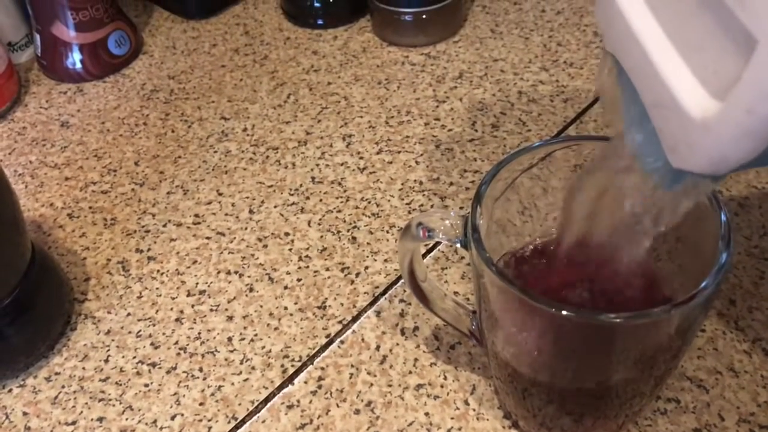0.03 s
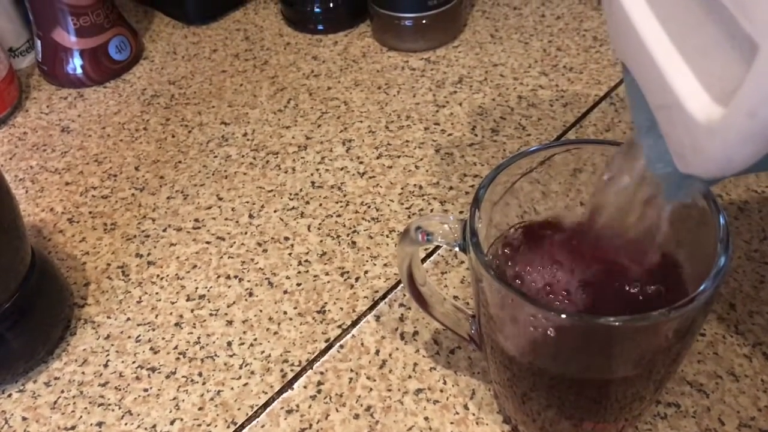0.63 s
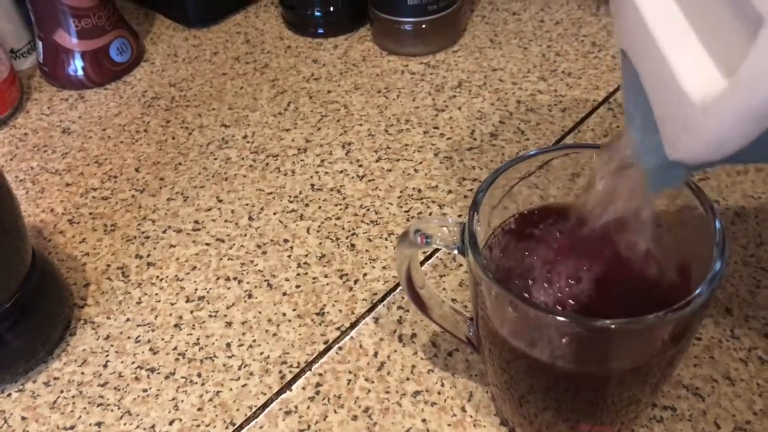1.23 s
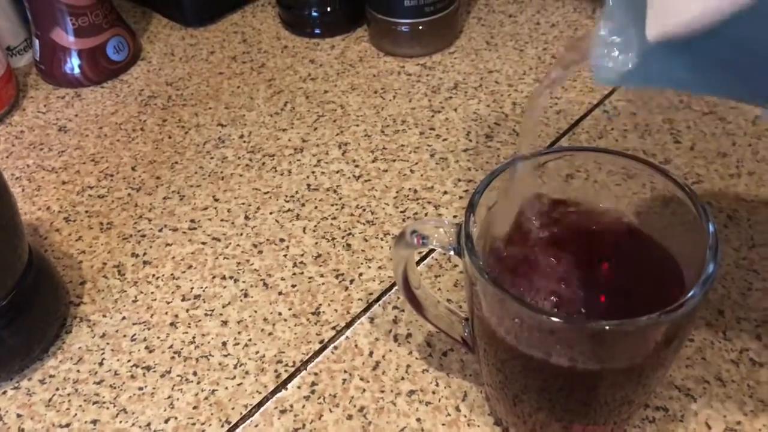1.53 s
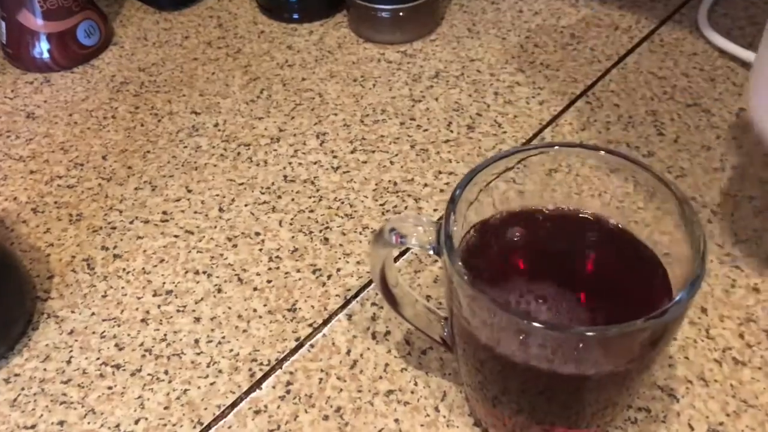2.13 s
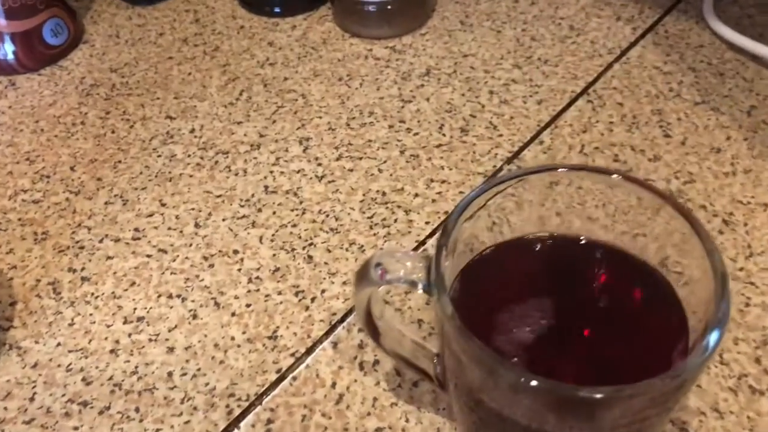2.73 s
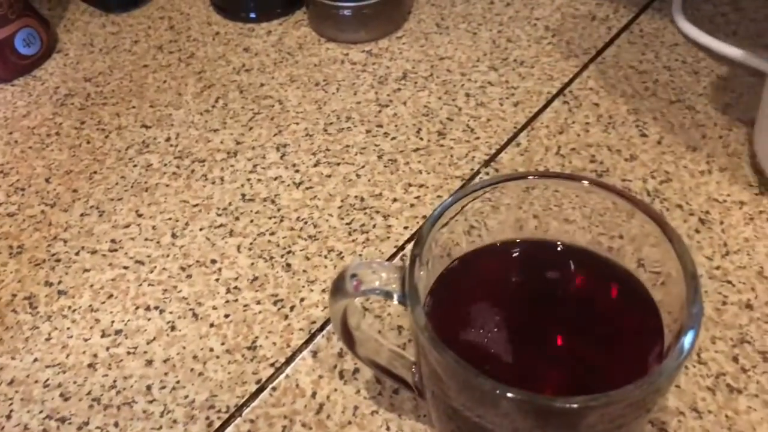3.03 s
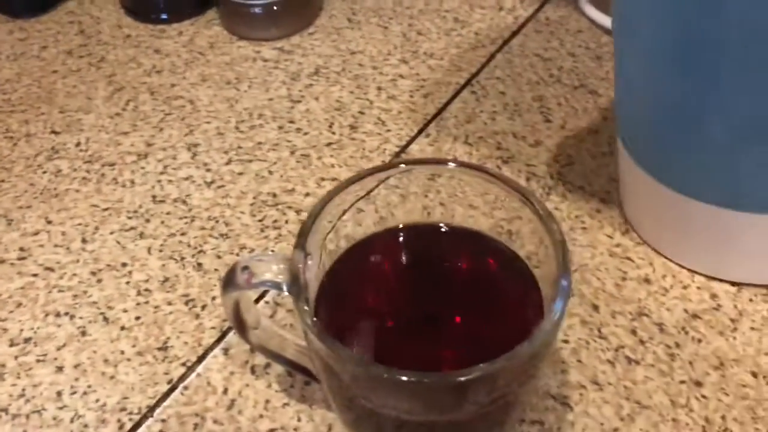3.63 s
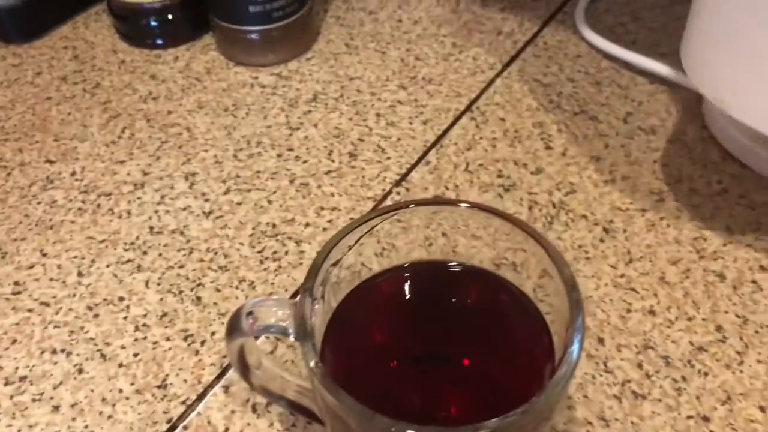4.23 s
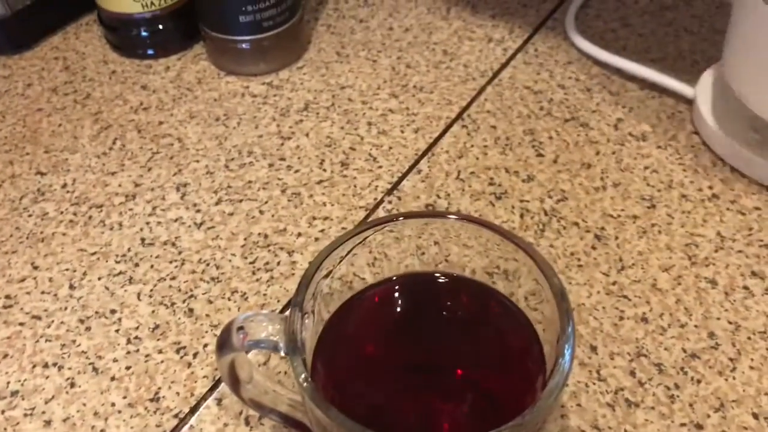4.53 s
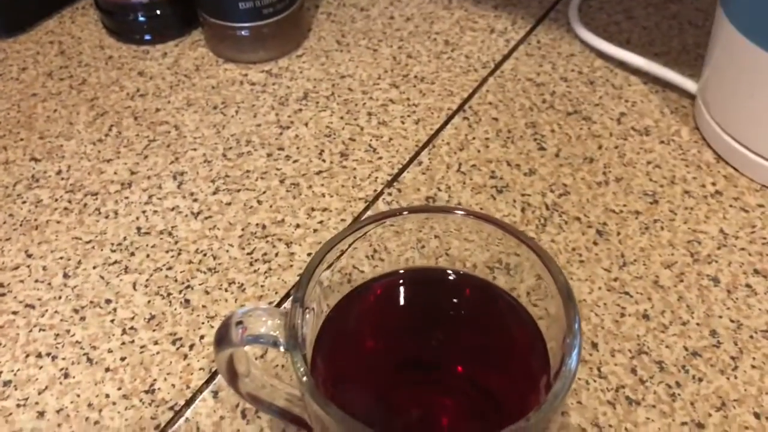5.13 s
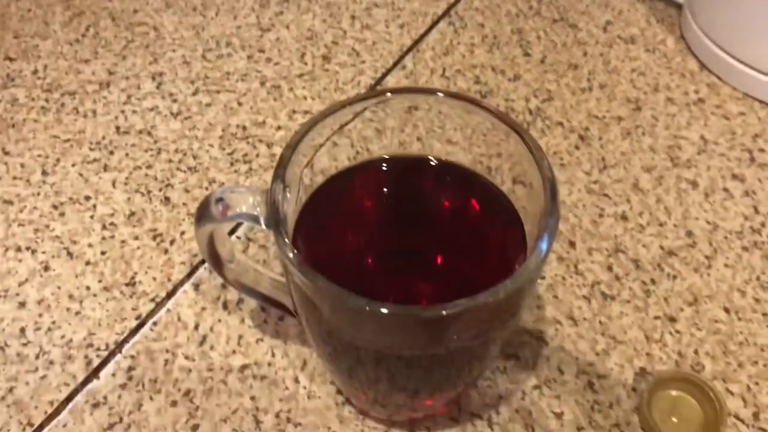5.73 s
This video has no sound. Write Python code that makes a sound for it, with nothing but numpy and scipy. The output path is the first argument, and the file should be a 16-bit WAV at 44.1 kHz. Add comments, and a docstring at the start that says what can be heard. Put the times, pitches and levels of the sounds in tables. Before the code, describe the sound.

Hot water pours from a kettle into a glass mug close to the microphone, gurgling, plopping and fizzing before it thins to a few last drops. A little further back, a bottle knocks and scuffs on a hollow kitchen worktop, each blow giving a dull boom. The kettle then rattles onto its base with a quick run of clacks. A low electrical hum sits underneath in the small room.

```python
"""Kettle pour in a small kitchen

Hot water runs into a glass mug: bubbles plop and fizz in its hollow, then the last drops fall.
The kettle is moved away, a bottle is knocked about on the worktop, and the kettle rattles home
onto its base. The hollow worktop booms under every blow; mains hum sits under it all."""
import sys
import numpy as np
from scipy import signal
from scipy.fft import rfft, irfft
from scipy.io import wavfile
from scipy.ndimage import uniform_filter1d

SR = 44100
rng = np.random.default_rng(int(sys.argv[2]) if len(sys.argv) > 2 else 0)


def wav_out(sig):
    """Save sig, one row per channel (or a flat mono array), as 16-bit PCM at SR to the path in sys.argv[1]."""
    wavfile.write(sys.argv[1], SR, np.round(np.clip(np.atleast_2d(sig).T, -1, 1) * 32767).astype(np.int16))


N = 255759
T = np.arange(N) / SR


def from_db(db):
    """Decibels to gain."""
    return 10 ** (np.asarray(db) / 20)


def unit_rms(x):
    """Scale to rms 1."""
    return x / np.sqrt(np.mean(x ** 2) + 1e-20)


def add(track, s, sound):
    """Mix a sound in at s seconds."""
    i = max(round(s * SR), 0)
    track[i:i + len(sound)] += sound[:N - i]


def decay(t60, size):
    """An envelope that falls 60 dB in t60 seconds."""
    return from_db(-60 * T[:size] / t60)


def attack(rise_s, size):
    """An envelope that eases up to full level."""
    return 1 - np.exp(-T[:size] / rise_s)


def stroke(start_s, length_s, edge_s):
    """An envelope that rises, holds and falls."""
    return np.clip(np.minimum(T - start_s, start_s + length_s - T) / edge_s, 0, 1)


def drift(rate_hz):
    """A modulator that glides between random values."""
    knots = rng.standard_normal(4000)
    return np.interp(T * rate_hz, np.arange(len(knots)), knots)


def colour(x, spectrum, tilt=0, pivot_hz=1200, size=8192):
    """Minimum-phase EQ through (Hz, dB) points, tilted in dB per octave about the pivot."""
    octave = np.log2(np.maximum(np.fft.rfftfreq(size, 1 / SR), 1))
    hz, db = np.transpose(spectrum)
    curve_db = np.interp(octave, np.log2(hz), db) + tilt * np.maximum(octave - np.log2(pivot_hz), -1)
    cepstrum = irfft(np.log(from_db(curve_db)))
    cepstrum[1:size // 2] *= 2
    cepstrum[size // 2 + 1:] = 0
    return signal.fftconvolve(x, irfft(np.exp(rfft(cepstrum))))[:len(x)]


def resonate(x, peaks):
    """Parallel resonators, each (pitch [Hz], width [Hz], level [dB])."""
    out = 0
    for hz, width, db in peaks:
        r = np.exp(-np.pi * width / SR)
        poles = [1, -2 * r * np.cos(2 * np.pi * hz / SR), r * r]
        out = out + from_db(db) * (1 - r * r) / 2 * signal.lfilter([1, 0, -1], poles, x + 1e-18)
    return out


def struck(modes, size=24000):
    """The ring after one blow, from modes of (pitch [Hz], level [dB], t60 [s])."""
    return sum(from_db(db) * np.sin(2 * np.pi * hz * T[:size]) * decay(t60, size)
               for hz, db, t60 in modes)


def grains(per_s, spread_db):
    """Random clicks of uneven size and sign."""
    chance, clicks = rng.random(N) * SR / per_s, np.zeros(N)
    hits = np.flatnonzero(chance < 1)
    strength = np.minimum(-np.log(chance[hits] + 1e-9), np.pi)
    clicks[hits] = (1 - 2 * (hits % 2)) * from_db(spread_db * strength)
    return clicks


def burst(t60, size, rise_s=1e-5):
    """A dying chatter of noise, evened out across the spectrum."""
    spectrum = rfft(rng.standard_normal(size) * decay(t60, size) * attack(rise_s, size), 2 * size)
    power = uniform_filter1d(abs(spectrum) ** 2, size=int(size / SR / t60 * 8) + 1)
    return irfft(spectrum * np.sqrt(power.mean() / power))[:size]


def kitchen(x, wet_db, t60, treble_t60, size=26000):
    """Add diffuse reflections from tiles and cupboards; the treble has its own decay time."""
    noise = rng.standard_normal(size)
    low = signal.sosfilt(signal.butter(1, 3000, fs=SR, output="sos"), noise)
    arrival = np.clip(T[:size] / 0.0013 - .5, 0, 1)
    tail = (low * decay(t60, size) + (noise - low) * decay(treble_t60, size)) * arrival
    return x + from_db(wet_db) * signal.fftconvolve(x, tail / np.linalg.norm(tail))[:N]


# Mains hum partials: (pitch [Hz], rms level [dB])
HUM_PARTIALS = [(100, -46.5), (215, -70)]
# Room tone EQ: (frequency [Hz], level [dB])
ROOM_EQ = [(20, -14), (50, -2), (110, -3), (160, -14), (230, -9), (380, -14), (600, -18), (900, -17.5),
           (1500, -20.5), (2800, -29), (3900, -25), (5500, -36.5), (9000, -43.5), (16000, -44.5)]
def background(room_db=-56):
    """The bed: mains hum, wavering a little, over quiet room tone."""
    hum = 0
    for hz, db in HUM_PARTIALS:
        level = np.sqrt(2) * from_db(db + 0.58 * drift(22))
        hum = hum + level * np.sin(2 * np.pi * hz * T + 0.29 * drift(10))
    return hum + from_db(room_db) * unit_rms(colour(rng.standard_normal(N), ROOM_EQ))


# Jolts that reach the spring: (time [s], level [dB])
SPRING_JOLTS = [(2.56, -50), (2.91, -53), (3.255, -30.5), (3.351, -39), (5.095, -49)]
# The spring's ring: (pitch [Hz], level [dB], t60 [s])
SPRING_MODES = [(6514, -17.5, 0.59), (11639, -21.5, 0.24), (14546, -3, .2)]
def spring(swell_s=0.01):
    """A small spring zings, thin and high, when the worktop is jolted."""
    out, zing = np.zeros(N), struck(SPRING_MODES)
    for s, db in SPRING_JOLTS:
        add(out, s, from_db(db) * zing * attack(swell_s, len(zing)))
    return out


# The hollow worktop's boom: (pitch [Hz], level [dB], t60 [s])
WORKTOP_MODES = [(48.4, 7, .16), (96.2, -9.5, 0.99), (140.4, -11, 0.16), (220.1, 3, 0.27),
                 (243.6, -7.5, 0.26), (311.4, -10.5, 0.3), (369.3, -9.5, .16), (424, -36.5, 0.057),
                 (594, -17, 0.053)]
# Rumble EQ of the cupboard below: (frequency [Hz], level [dB])
CUPBOARD_EQ = [(20, -15), (45, 1), (110, 13.5), (165, -6.5), (230, 4.5), (330, -5), (600, -8), (1200, -29),
               (4000, -76.5)]
# A weight set down softly: (time [s], level [dB])
SOFT_LANDINGS = [(2.579, -26), (2.824, -48), (2.913, -23.5), (2.973, -26.5), (3.075, -33), (3.2357, -18.5),
                 (3.2554, -18.5), (3.334, -19.5), (3.3478, -24.5), (3.726, -44), (3.817, -41), (4.645, -36),
                 (5.048, -24), (5.327, -43.5)]
def worktop(bottle_db=-18.5, kettle_db=-17, follows=0.61, boom_db=1, bump_db=11, size=24000):
    """Every blow booms in the worktop and shakes the cupboard; a soft landing adds a dull bump."""
    out = np.zeros(N)
    low_cut = signal.butter(2, 55, "high", fs=SR, output="sos")
    boom = signal.sosfilt(low_cut, struck(WORKTOP_MODES, size)) * attack(0.00054, size)
    thuds = [(s, bottle_db + follows * db) for s, db, _ in BOTTLE_HITS]
    thuds += [(s, kettle_db + follows * db) for s, db in KETTLE_HITS]
    for blows, rumble_db in [(thuds, 16), (SOFT_LANDINGS, 12)]:
        for s, db in blows:
            rumble = colour(burst(t60=0.18, size=size // 2), CUPBOARD_EQ)
            add(out, s, from_db(db + boom_db) * boom)
            add(out, s, from_db(db + rumble_db) * rumble)
    body = [(610, 450, 0)]   # one broad, woody resonance
    for s, db in SOFT_LANDINGS:
        bump = resonate(resonate(burst(t60=0.043, size=4000), body), body)
        add(out, s, from_db(db + bump_db) * bump)
    return out


# Dull rub of the kettle's foot: (frequency [Hz], level [dB])
DRAG_EQ = [(150, 2), (330, 3.5), (600, -6.5), (1100, -9.5), (2200, -19.5), (3500, -38), (9000, -60.5)]
def kettle_drag(slip_hz=125, level_db=-43.5):
    """The kettle's foot drags briefly, sticking and slipping in quick uneven jerks."""
    slip_count = np.floor(np.cumsum(slip_hz * (1 + 0.1 * drift(180))) / SR)
    rub = unit_rms(np.diff(slip_count, prepend=0)) + rng.standard_normal(N)
    pressure = stroke(start_s=4.01, length_s=0.083, edge_s=0.0081)
    return from_db(level_db) * pressure * unit_rms(colour(rub, DRAG_EQ))


# Slides of the bottle: (time [s], length [s], level [dB])
BOTTLE_SLIDES = [(2.545, 0.077, -35.5), (2.774, 0.055, -45), (3.222, 0.173, -36.5), (3.62, 0.3, -59)]
def bottle_scuffs():
    """The bottle's base catches on the grain of the worktop as it slides."""
    pressure = sum(from_db(db) * stroke(s, length, edge_s=0.048) for s, length, db in BOTTLE_SLIDES)
    catches = grains(per_s=900, spread_db=3)
    return pressure * unit_rms(colour(catches, BOTTLE_EQ, tilt=-2))


def with_rebounds(hits, gap_s, loss_db, count=2):
    """Follow each hit with weaker rebounds at uneven gaps."""
    rows = []
    for (s, db, hardness), gaps in zip(hits, rng.uniform(.5, 1.5, (len(hits), count))):
        for k, delay in enumerate(np.cumsum([0, *gaps])):
            rows.append((s + gap_s * delay, db - loss_db * k, hardness))
    return rows


def clacks(hits, eq, modes, t60, ring_db, seat_s, crack_db=1, crack_t60=0.0077, size=6000):
    """Each contact cracks and chatters as the surfaces seat; harder hits ring brighter."""
    out = np.zeros(N)
    for s, db, hardness in hits:
        contact = burst(t60, size, seat_s) + from_db(crack_db) * burst(crack_t60, size, seat_s)
        clack = from_db(db) * colour(contact, eq, hardness)
        add(out, s - seat_s, clack)
        # the reflection off the worktop hollows each knock in its own way
        add(out, s - seat_s + rng.uniform(.0005, .002), from_db(-6) * clack)
    return out + from_db(ring_db) * resonate(out, modes)


# Bottle on worktop: (time [s], level [dB], hardness [dB/octave])
BOTTLE_HITS = [(2.423, -48, 0), (2.5437, -22.5, -2.5), (2.5953, -28, -5), (2.824, -44, -5),
               (2.8885, -13, 2), (2.8956, -19, -8), (2.929, -24, -3), (2.944, -37, 8), (2.9532, -18, 3.5),
               (3.079, -42, 2.5), (3.109, -36.5, -5), (3.1299, -29, -2.5), (3.2348, -31, -2.5),
               (3.251, -28.5, 0.5), (3.3142, -27.5, 1.5), (3.374, -30, 1.5), (3.441, -35.5, -1.5),
               (3.576, -48, 3), (3.726, -48.5, -2)]
# Tone of its contact: (frequency [Hz], level [dB])
BOTTLE_EQ = [(150, -15), (500, -13), (750, -3.5), (1250, 1.5), (2000, 2), (2800, -4.5), (3900, -3.5),
             (5000, -13.5), (6500, -19), (10000, -28), (16000, -37.5)]
# Its ring: (pitch [Hz], width [Hz], level [dB])
BOTTLE_RING = [(613, 95, 9.5), (1060, 39, 10.5), (1135, 55, 2), (1280, 53, 7.5), (1547, 18, 3),
               (2435, 25, 6), (3550, 46, 3), (3720, 27, -5.5), (4100, 61, 4), (5570, 120, 1.5),
               (6400, 60, 13.5)]
def bottle():
    """The bottle knocks on the worktop, bouncing tightly and ringing."""
    hits = with_rebounds(BOTTLE_HITS, gap_s=0.0081, loss_db=11)
    return from_db(14.5) * clacks(hits, BOTTLE_EQ, BOTTLE_RING, t60=0.038, ring_db=-4.5, seat_s=0.00088)


# Kettle finding its base: (time [s], level [dB])
KETTLE_HITS = [(4.642, -36), (4.6744, -33.5), (4.8059, -32), (4.849, -36), (4.962, -25.5), (4.986, -25),
               (5.003, -21.5), (5.013, -18), (5.0298, -18.5), (5.1, -37), (5.266, -49), (5.316, -53.5)]
# Tone of its contact: (frequency [Hz], level [dB])
KETTLE_EQ = [(150, 3), (380, -1), (480, -5.5), (700, 1.5), (1200, 6), (2100, -4), (3000, -6), (4200, -7.5),
             (5500, -15), (9500, -27), (16000, -34)]
# Its body's ring: (pitch [Hz], width [Hz], level [dB])
KETTLE_RING = [(248, 36, 19), (357, 55, 18), (603, 54, 9.5), (1055, 37, 4), (1426, 42, -1), (1920, 140, 10),
               (4050, 110, -7)]
def kettle(hardness=0.73):
    """The kettle rattles onto its base, each clack ringing its low body modes."""
    hits = with_rebounds([(s, db, hardness) for s, db in KETTLE_HITS], gap_s=0.015, loss_db=10.5)
    return from_db(12.5) * clacks(hits, KETTLE_EQ, KETTLE_RING, t60=0.037, ring_db=-2, seat_s=0.0015)


def bubble_times(chance, crowding):
    """Spread 0-1 values over the pour, denser in strong flow; return times [s] and flow [dB]."""
    flow_db = np.interp(T, *np.transpose(POUR_LEVEL)) - FULL_FLOW_DB
    due = np.cumsum(from_db(crowding * flow_db) * (T < POUR_END_S))
    times = np.interp(chance, due / due[-1], T)
    return times, np.interp(times, T, flow_db)


def fine_bubbles(count=420, centre_hz=6480, level_db=-37, spread_db=5, cycles=24, size=600):
    """Tiny bubbles burst at the surface in short pings, higher and softer as the stream thins."""
    out = np.zeros(N)
    times, flow_db = bubble_times(rng.random(count), crowding=.45)
    detune, strength = rng.standard_normal((count, 2)).T
    pitches = np.minimum(centre_hz * 2 ** (0.52 * detune - 0.02 * flow_db), SR / 2)
    levels = level_db + 0.36 * flow_db + spread_db * strength
    for s, hz, db in zip(times, pitches, levels):
        add(out, s, from_db(db) * np.sin(2 * np.pi * hz * T[:size]) * decay(cycles / hz, size))
    return out


# The stream thins as the kettle is eased back, surges once and stops: (time [s], level [dB])
POUR_LEVEL = [(0, -35.5), (.14, -41), (.55, -44), (.85, -51), (1.28, -51), (1.38, -41.5), (1.5, -56),
              (1.63, -57), (1.7, -80)]
FULL_FLOW_DB, POUR_END_S = -40, POUR_LEVEL[-1][0]
# The glass mug and the air in it: (pitch [Hz], width [Hz], level [dB])
MUG_MODES = [(216, 71, -6.5), (444, 440, -13.5), (841, 33, -4), (1215, 40, -3.5), (1283, 120, 2),
             (1653, 190, -2.5), (3040, 210, -4.5), (3162, 214, -1), (4460, 250, -9), (5830, 520, -24.5)]
# Tone of spray and bursting foam: (frequency [Hz], level [dB])
SPRAY_EQ = [(50, -16), (220, 0.5), (600, -8.5), (2400, -2.5), (4000, 0), (6300, 3.5), (8500, 0.5),
            (10500, -4.5), (13000, 3), (16000, -3)]
def stream(cycles=17, foam_settles_s=1.96, foam_fall_db_per_s=6):
    """Small bubbles gurgle through the mug's resonances; finer ones tick as spray and fizz as foam."""
    gurgle_db = np.interp(T, *np.transpose(POUR_LEVEL))
    foam_db = -64.5 - foam_fall_db_per_s * np.maximum(T - foam_settles_s, 0)
    spray_db = np.maximum(-61 + 0.52 * (gurgle_db - FULL_FLOW_DB), foam_db)
    surge = from_db(4 * drift(55))   # the jet drags air under in quick gulps
    bubbles = 0
    for hz in np.geomspace(450, 7000, 28):
        width = np.log(1000) / np.pi * hz / cycles
        births = grains(per_s=36, spread_db=4.5)
        bubbles = bubbles + unit_rms(resonate(births, [(hz, width, 0)]))
    splatter = from_db(-1) * unit_rms(grains(per_s=300, spread_db=5))
    ticks = grains(per_s=600, spread_db=5)
    gurgle = resonate(surge * (unit_rms(bubbles) + splatter), MUG_MODES)
    spray = from_db(spray_db) * unit_rms(colour(ticks * surge, SPRAY_EQ, tilt=-0.763))
    fizz = from_db(foam_db - 1) * unit_rms(colour(rng.standard_normal(N), SPRAY_EQ, tilt=1))
    return from_db(gurgle_db) * unit_rms(gurgle) + spray + fizz


# Deep glugs, plops and plinks: (pitch [Hz], share [0-1], ring level [dB])
BUBBLE_KINDS = [(490, .18, -38), (1580, .62, -26), (3360, .2, -30.5)]
def lesser_plops(count=80, gather=.35, spread_octaves=0.28):
    """Rows like BIG_PLOPS for air the jet keeps dragging under: busier and louder in strong flow."""
    when, kind, detune = rng.random((count, 3)).T
    ring, splash = rng.standard_normal((count, 2)).T
    times, flow_db = bubble_times((np.arange(count) + when) / count, crowding=.25)
    gulps = np.array(BIG_PLOPS)[:, 0]
    nearest_gulp = gulps[np.argmin(abs(times[:, None] - gulps), axis=1)]
    times = times + gather * (nearest_gulp - times)
    kind_hz, share, kind_db = np.transpose(BUBBLE_KINDS)
    pick = np.searchsorted(np.cumsum(share), kind * share.sum())
    hz = kind_hz[pick] * 2 ** (spread_octaves * (2 * detune - 1))
    ring_db = kind_db[pick] + 0.46 * flow_db + 3 * ring
    splash_db = -37 + flow_db + 5.5 * splash
    return list(zip(times, hz, ring_db, splash_db))


# The biggest bubbles and the last drops: (time [s], pitch [Hz], ring level [dB], splash level [dB])
BIG_PLOPS = [(0.0176, 3240, -6, -47), (0.0737, 1590, -19, -40), (.1017, 1780, -21.5, -14.5),
             (0.155, 1560, -18, -9), (0.2114, 5500, -13, -35), (.272, 2940, -31, -20),
             (0.349, 1460, -21, -30), (0.43, 1500, -20, -46), (0.4644, 1450, -20, -16),
             (0.5359, 3500, -18.5, -21), (0.569, 1860, -22.5, -19.5), (0.638, 1420, -33, -15.5),
             (0.7696, 3140, -22.5, -18), (0.867, 1720, -28.5, -25.5), (0.8782, 1470, -20, -39),
             (0.9079, 1560, -25, -31), (1.0374, 1480, -21, -50), (1.1117, 1540, -22, -48),
             (1.1353, 1670, -20, -54), (1.1655, 3150, -26, -25), (1.2186, 1460, -28, -36),
             (1.2569, 1610, -24, -35), (1.3048, 1400, -23, -42), (1.343, 3300, -22.5, -23.5),
             (1.3714, 3470, -21, -22), (1.3968, 1330, -22, -38), (1.449, 3350, -20.5, -27),
             (1.4772, 1280, -36, -22), (1.5557, 1560, -29.5, -35.5), (1.5662, 3330, -30, -48),
             (1.5976, 1640, -35, -24), (1.6352, 3180, -31, -54), (1.761, 1120, -35.5, -60),
             (1.7821, 1030, -26.5, -26.5), (1.7972, 1000, -33, -29), (1.8933, 1350, -27, -52),
             (1.9218, 9700, -25, -22.5)]
def plops(cycles=13, calm_cycles=20, rise=0.011, hollow_db=-6, droplets_db=-11, size=2400):
    """A bubble rings, bending up slightly; its birth sounds the mug's air and throws droplets."""
    rings, splashes, t = np.zeros(N), np.zeros(N), T[:size]
    for s, hz, ring_db, splash_db in BIG_PLOPS + lesser_plops():
        t60 = (cycles if s < POUR_END_S else calm_cycles) / hz   # calm water lets it ring on
        bend = 1 + rise * np.minimum(t / t60, 1)
        ring = np.sin(2 * np.pi * hz * t * bend) * decay(t60, size) * attack(0.5 / hz, size)
        hollow = resonate(burst(t60=0.018, size=size), MUG_MODES)
        plop = ring / ring.max() + from_db(hollow_db) * hollow / abs(hollow).max()
        add(rings, s, from_db(ring_db) * plop)
        scatter = unit_rms(rng.standard_normal(size) ** 3)
        droplets = from_db(droplets_db) * scatter * decay(0.035, size)
        brightness = np.interp(s, [0, 1.9], [-2, .8])   # the thinning stream throws finer drops
        splash = colour(burst(t60=0.0022, size=size) + droplets, SPRAY_EQ, tilt=brightness)
        add(splashes, s, from_db(splash_db) * splash / np.linalg.norm(splash))
    return from_db(-3.5) * rings + from_db(6.5) * splashes


def scene():
    """The mono mix: the pour up close, the knocks further back, the room underneath."""
    water = kitchen(plops() + stream() + fine_bubbles(), wet_db=-11.5, t60=0.056, treble_t60=0.073)
    handling = bottle() + kettle() + bottle_scuffs() + kettle_drag()
    knocks = kitchen(handling, wet_db=-10.5, t60=0.3, treble_t60=0.2)
    return (water + knocks + worktop() + spring() + background())[None]


def record(dry, low_cut_hz=36, ceiling=1.3, high_cut_hz=16200):
    """The microphone loses the deepest bass, the highest peaks are rounded and the top is cut."""
    trimmed = signal.sosfilt(signal.butter(2, low_cut_hz, "high", fs=SR, output="sos"), dry)
    rounded = ceiling * np.tanh(trimmed / ceiling)
    return signal.sosfilt(signal.ellip(10, .1, 80, high_cut_hz, fs=SR, output="sos"), rounded)


dry = scene()
out = record(dry)
wav_out(out)
```